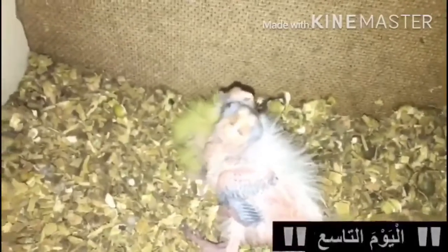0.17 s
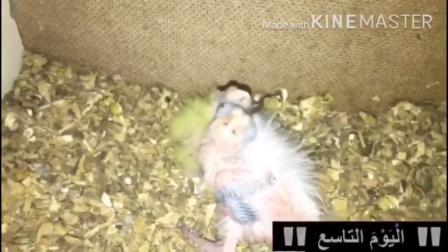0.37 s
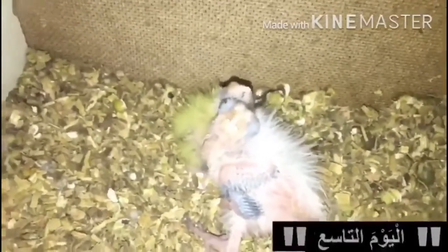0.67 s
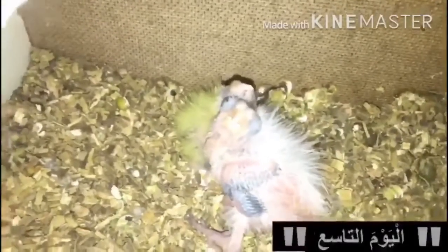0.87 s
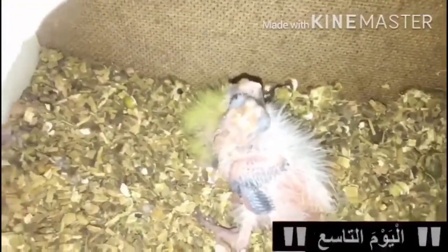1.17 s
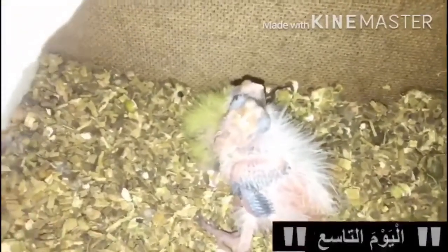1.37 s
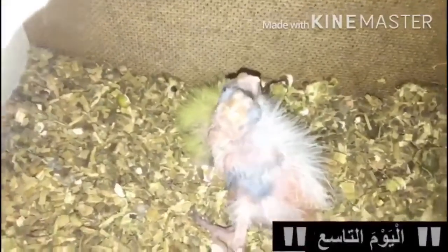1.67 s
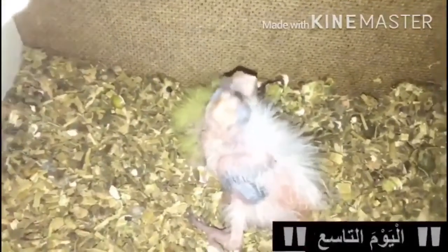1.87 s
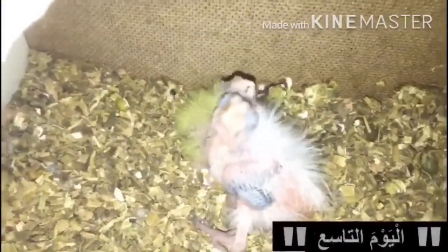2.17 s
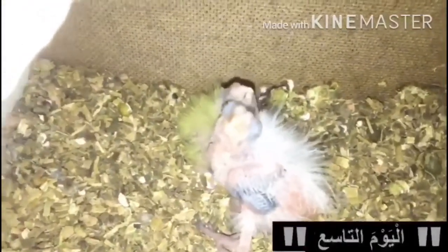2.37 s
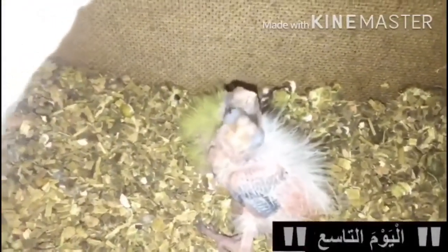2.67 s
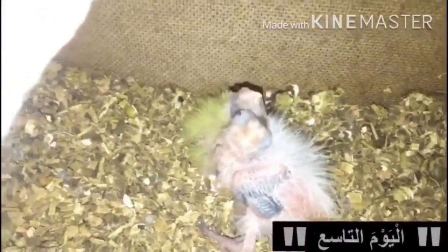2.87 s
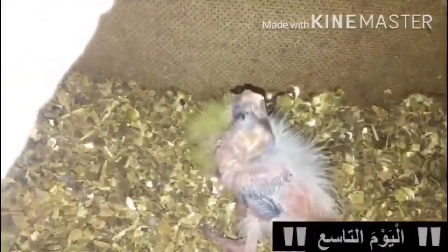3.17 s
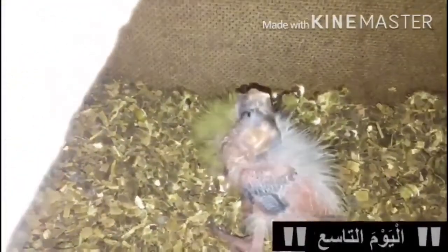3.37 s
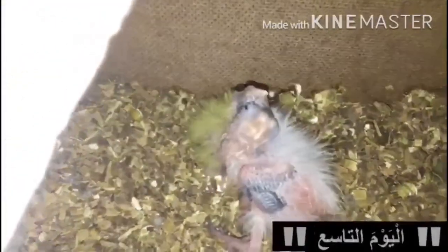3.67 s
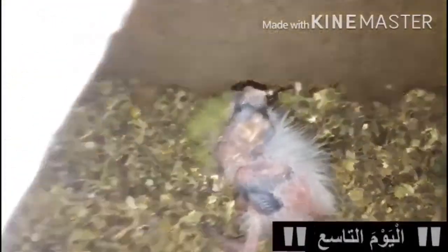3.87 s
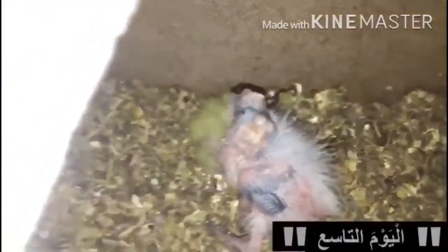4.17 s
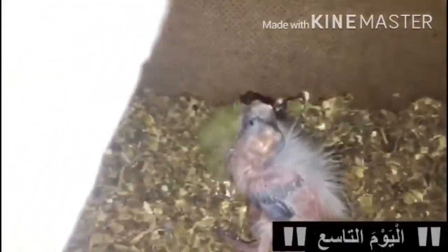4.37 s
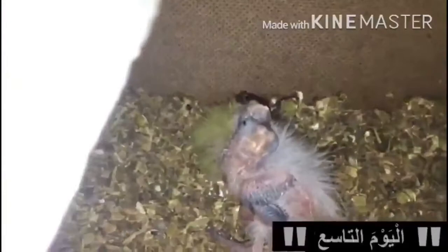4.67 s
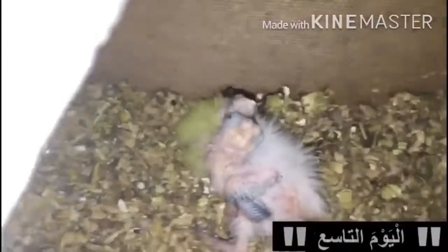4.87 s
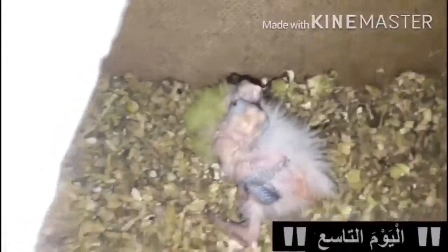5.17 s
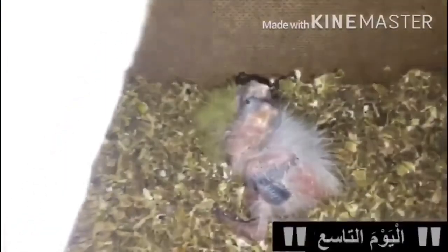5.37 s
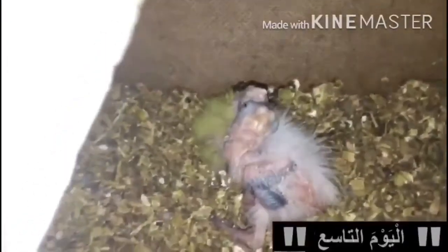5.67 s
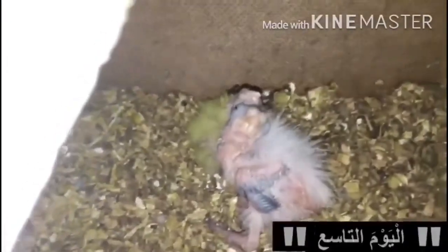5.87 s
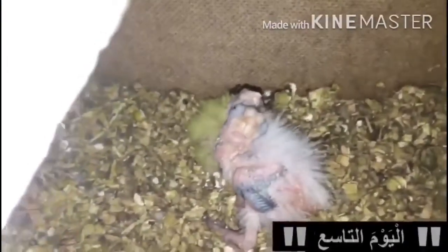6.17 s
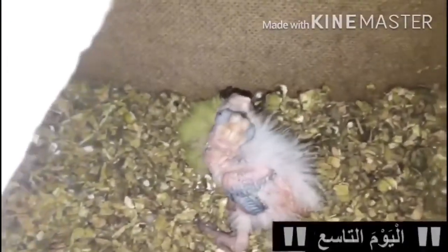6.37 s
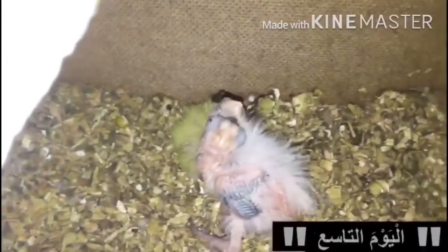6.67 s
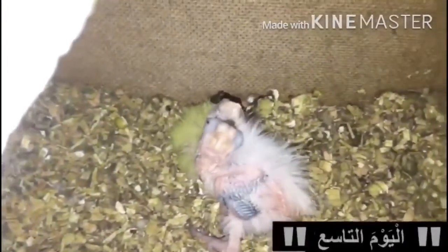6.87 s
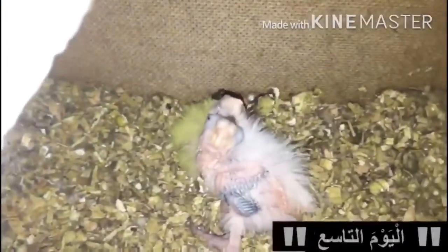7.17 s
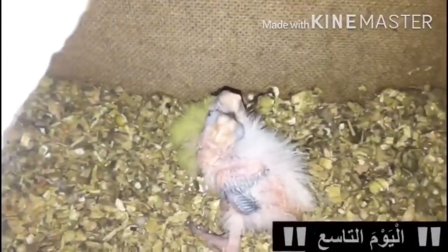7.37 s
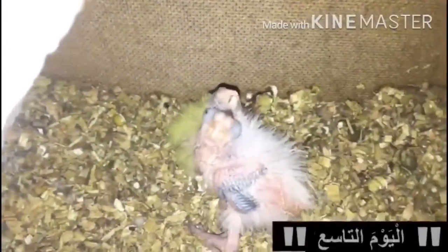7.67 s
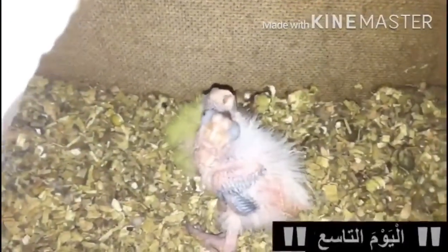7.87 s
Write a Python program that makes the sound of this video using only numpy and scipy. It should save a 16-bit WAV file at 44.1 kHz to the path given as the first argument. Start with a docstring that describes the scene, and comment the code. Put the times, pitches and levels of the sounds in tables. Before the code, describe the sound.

In a small nest box, a parrot chick begs in harsh, unstable screeches around 4 to 6 kHz, edged with hissing air. Rough lower voices near 3 kHz chatter continually with throaty rasping and croaking. From 0 to 3 s the calls come irregularly, several per second, with a small click at 1.6, a rub at 2.4 and a light thud at 2.7. Around 3.5 s a squeak leaps up and drops, beside short whistles. Heavy low thuds cluster from 3.95 to 4.25. The main screech weakens between 4.3 and 5 while chatter and gliding notes continue, then returns sharply near 5.1 and 5.4. Small clicks come around 5.7. Hollow knocks and rubbing hit at 6.7 and 7.0; from 6.9 to 7.9 screeches pulse quickly and evenly, about seven per second. Low rumble persists, its hum stronger after 5.9. Close mono microphone, short boxy echoes.

```python
"""Parrot chick begging in a nest box

A chick screeches harshly: its voice jumps about in pitch, with hissing air on top. Three lower rough
voices chatter over rasping and croaking noise, and gliding tones whistle, all with echoes.
Rubs shake the box as bands of noise, knocks ring it as fading tones, and a low hum and noise rumble.
One microphone feeds both channels.
"""
import sys
import numpy as np
from scipy import signal
from scipy.fft import rfft, irfft, next_fast_len
from scipy.io import wavfile
from scipy.ndimage import uniform_filter1d, map_coordinates

SR = 44100
rng = np.random.default_rng(int(sys.argv[2]) if len(sys.argv) > 2 else 0)


def wrap_up_sound(samples):
    """Save the sound to the file named by the first command line argument, as 16-bit audio."""
    columns = np.atleast_2d(samples).T
    # keep every value between -1 and 1, then stretch to whole-number steps
    tamed = np.clip(columns, -1, 1)
    steps = np.round(tamed * 32767).astype(np.int16)
    wavfile.write(sys.argv[1], SR, steps)


N = 353990  # length of the scene, samples

# In calls and rubs, swell_s is the time taken to rise by SWELL_DB up to the peak.
# Levels are relative ones within the mix; scatter is the size of random pitch jumps, as a share.

# The chick's screeches: [peak_s, swell_s, hold_s, fade_db_per_s, level_db, pitch_hz,
# hiss_db (relative to level_db), scatter_share]
SCREECHES = [ (0.082, 0.22, 0.0053, 90, -16, 4310, -7, 0.23),
             (0.426, 0.034, 0.0055, 62, -38.5, 5350, 4.5, 0.17),
             (0.687, .11, 0.021, 110.5, -27.5, 4540, -2.5, 0.21),
             (0.877, 0.023, 0.058, 109.5, -13.5, 4303, -8.5, 0.22),
             (1.052, 0.18, 0.0094, 100.5, -14.5, 4960, -6, 0.23),
             (1.445, 0.015, .01, 60, -18.5, 4655, -28, 0.049), (1.467, 0.03, .06, 99, -12, 4657, -24, 0.06),
             (1.533, 0.05, 0.043, 130, -16, 5490, -3.5, 0.1407),
             (1.6, 0.065, 0.019, 150, -18, 4470, -18, 0.076),
             (1.79, 0.2, 0.017, 90.5, -18.5, 5270, -6, 0.18),
             (2.02, 0.15, 0.035, 109.5, -21, 4350, -8.5, 0.15),
             (2.171, 0.05, 0.045, 110, -13, 5570, -9, 0.17),
             (2.44, 0.05, 0.043, 80.5, -25, 4540, -7.5, 0.15),
             (2.56, 0.2, 0.046, 120.5, -19.5, 4605, -9, .16),
             (2.864, 0.054, 0.042, 77.5, -22, 4170, -5, 0.18),
             (3.14, 0.37, 0.031, 166, -22.5, 4495, -6.5, 0.21),
             (3.265, 0.06, 0.029, 97.5, -19.5, 4400, -10.5, 0.19),
             (3.552, 0.039, 0.034, 110, -14, 5740, -6, 0.23),
             (3.86, 0.044, 0.054, 101, -21.5, 5300, -7.5, 0.16),
             (4.006, 0.054, 0.0076, 123, -18, 4380, -5.5, 0.16),
             (4.267, 0.056, 0.031, 71, -26, 4405, -5.5, 0.13),
             (4.55, 0.14, 0.051, 45.5, -36.5, 3480, -12, .15), (4.901, .1, 0.13, 97, -36.5, 4304, 0, 0.14),
             (5.086, 0.02, 0.04, 110, -18, 6000, -6, 0.17),
             (5.37, 0.076, 0.032, 109, -11.5, 5120, -7, 0.17),
             (5.771, 0.046, 0.046, 95, -29.5, 4275, -11, 0.0997),
             (5.842, 0.031, 0.039, 110, -23.5, 5410, -3, .08),
             (6.045, 0.036, 0.073, 128.5, -20, 5050, -2, 0.2),
             (6.325, 0.31, 0.0526, 57, -27.5, 4214, -29, 0.15), (6.519, 0.095, .3, 60.5, -42, 4205, 1, .17),
             (6.885, 0.076, 0.033, 157.5, -17.5, 5780, -5.5, 0.15),
             (7.035, 0.067, 0.048, 198, -15.5, 5600, -6.5, 0.17),
             (7.185, 0.067, 0.033, 192, -16, 5200, -2.5, 0.19),
             (7.33, 0.065, 0.025, 206, -16.5, 5256, -2, 0.19),
             (7.465, 0.055, .02, 211, -14.5, 5260, -4, 0.21),
             (7.61, 0.079, 0.04, 171.5, -19, 4297, 0.5, .16),
             (7.76, 0.09, 0.032, 135, -22.5, 5210, 1, 0.17), (7.9, 0.13, 0.022, 164, -22, 5060, -1.5, 0.15)]
# Hissing air: [frequency_hz, level_db_per_hz]
HISS_SPECTRUM = [(3530, -30), (6000, -4), (7200, -9.5), (8510, -10.5), (9320, -14), (11100, -18),
                 (11600, -15), (12100, -87), (15700, -78), (22000, -120)]
# Colour of the open beak: [frequency_hz, gain_db]
BEAK_COLOUR = [(4300, 2.5), (5700, 3), (6300, 0.5), (6900, -6), (8500, -9)]
# Calls of the lower voices: [peak_s, swell_s, hold_s, fade_db_per_s, level_db, pitch_hz, scatter_share]
CHATTERS = [ (0.137, 0.38, 0.012, 90.5, -18.5, 3280, 0.15), (0.276, 0.24, 0.11, 150.5, -22.5, 2764, 0.11),
            (0.636, 0.049, 0.018, 100, -19, 2673, 0.074), (0.7, .08, 0.045, 250.5, -17, 2353, 0.17),
            (0.888, 0.052, 0.024, 69.5, -17.5, 3372, 0.12), (1.047, 0.19, 0.012, 119, -18.5, 3234, 0.09),
            (1.257, 0.76, 0.1, 120, -23, 2818, 0.12), (1.515, 0.091, 0.029, 100, -19.5, 3263, 0.099),
            (1.78, 0.18, 0.14, 156, -24, 2816, .12), (2.031, 0.21, 0.051, 148.5, -21, 2840, 0.1),
            (2.188, 0.094, 0.08, 102, -20.5, 3166, 0.14), (2.45, 0.39, 0.039, 95.5, -24, 2812, .12),
            (2.58, 0.29, 0.041, 110, -22, 2870, 0.14), (2.72, 0.091, 0.037, 149.5, -28, 2309, 0.1),
            (2.835, .05, 0.0601, 109, -25, 3555, .07), (2.879, 0.05, 0.03, 130.5, -21.5, 3274, 0.12),
            (3.051, 0.1, 0.1, 171, -17, 3210, 0.1), (3.3, 0.23, .02, 89, -24, 2870, .12),
            (3.697, 0.35, 0.04076, 103, -24.5, 2750, .1), (3.879, 0.068, 0.04, 146.5, -22.5, 3036, 0.11),
            (3.996, 0.11, 0.059, 130.5, -20, 2837, 0.09), (4.27, 0.11, 0.038, 97.5, -23, 2605, 0.13),
            (4.444, 0.3026, 0.073, 130.5, -18, 2890, 0.09), (4.628, 0.11, 0.051, 150.5, -27.5, 2300, 0.066),
            (4.883, 0.12, 0.05, 139.5, -19.5, 2817, 0.11), (5.023, 0.27, 0.03, 99.5, -24.5, 2307, 0.082),
            (5.118, 0.14, 0.018, 89.5, -20, 2819, 0.16), (5.407, 0.21, 0.074, 90, -14.5, 3080, 0.098),
            (5.6, 0.287, 0.031, 151, -22, 2496, 0.12), (5.82, 0.062, 0.09, 59.5, -19, 2727, 0.11),
            (6.117, 0.29, 0.044, 302, -16.5, 2910, 0.15), (6.255, 0.197, 0.11, 69.5, -21, 3082, 0.11),
            (6.511, 0.076, 0.057, 110.5, -16, 3130, 0.081), (6.689, .2, 0.019, 147.5, -25, 2847, .1),
            (6.787, 0.053, 0.0051, 304, -22, 2692, 0.086), (6.888, 0.054, 0.089, 157, -19.5, 3083, 0.13),
            (7.059, 0.14, 0.035, 98.5, -21.5, 3007, .12), (7.193, 0.22, .01, 130.5, -19.5, 3018, 0.11),
            (7.326, 0.17, 0.021, 133, -20.5, 2796, 0.13), (7.472, 0.076, 0.02, 199, -20, 2952, 0.12),
            (7.62, 0.082, 0.018, 115.5, -17, 3312, 0.12), (7.779, 0.18, 0.086, 98, -21.5, 3003, 0.13)]
# The flock's throats over time: [time_s, rasp_db, croak_db]
THROATS = [(0.0, -33, -40), (0.13, -28, -30.5), (0.65, -32, -39), (0.69, -23, -29), (0.76, -29, -39),
           (0.85, -27, -32), (1.18, -30, -44), (1.97, -33, -36.5), (2.32, -29.5, -45), (2.48, -30.5, -35),
           (2.64, -30.5, -47), (2.68, -27, -30.5), (2.72, -45, -52), (2.83, -36, -48), (2.88, -33, -46.5),
           (3.17, -29.5, -29.5), (3.51, -28.5, -40), (3.58, -31, -47), (3.82, -31, -40.5),
           (4.05, -30.5, -31), (4.09, -33, -44), (4.75, -28, -34), (4.98, -24, -36), (5.19, -32.5, -39),
           (5.56, -24.5, -40), (5.65, -37, -44), (6.59, -33, -44), (6.68, -33, -42), (6.86, -28.5, -42),
           (7.76, -25.5, -38), (8.03, -36, -35)]
# Throaty rasp: [frequency_hz, level_db_per_hz]
RASP_SPECTRUM = [(800, -63), (1100, -10.5), (1300, -4), (1600, -0.5), (2300, -3), (2990, -26), (5060, -120)]
# Throaty croak: [frequency_hz, level_db_per_hz]
CROAK_SPECTRUM = [(440, -104), (720, -17), (950, -1.5), (1150, -4), (1500, -32), (2500, -120)]
# The box's steady boom and rustle over time: [time_s, wall_db, cavity_db, scrape_db]
STEADY_BOX = [(0.0, -31, -28.5, -39.5), (1.59, -34, -30.5, -47.5), (3.89, -42.5, -35.5, -70),
              (4.11, -28.5, -28, -42), (4.45, -39.5, -34, -52.5), (6.2, -36.5, -35, -47),
              (6.84, -39, -32, -47), (7.18, -40.5, -35, -60), (8.03, -39.5, -36.5, -56)]
# Rubs along the box: [peak_s, swell_s, hold_s, wall_db, cavity_db, scrape_db]
RUBS = [(0.18, 0.18, 0.066, -33, -23, -53), (0.83, 0.31, 0.11, -29, -41, -39.5),
        (2.167, 0.23, 0.021, -48, -27, -52), (2.401, 0.089, 0.077, -20.5, -24, -35),
        (2.668, 0.089, 0.017, -40, -44, -41.5), (2.899, 0.31, 0.18, -60, -33.5, -47),
        (3.443, 0.34, 0.046, -44, -40, -45), (3.979, 0.11, 0.09, -30.5, -23.5, -33.5),
        (5.961, 0.22, 0.022, -32.5, -46, -39.5), (6.714, 0.21, 0.018, -30, -18.5, -26),
        (6.878, 0.071, 0.063, -20.5, -17.5, -32)]
# Shaking wall: [frequency_hz, level_db_per_hz]
WALL_SPECTRUM = [(56, -42), (95, -4.5), (167, -3), (220, -1.5), (290, -21), (480, -120)]
# Booming cavity: [frequency_hz, level_db_per_hz]
BOOM_SPECTRUM = [(120, -48), (200, -11), (254, -2), (307, 4.5), (388, -5.5), (500, -21), (650, -67),
                 (1100, -120)]
# Scraping: [frequency_hz, level_db_per_hz]
SCRAPE_SPECTRUM = [(250, -12.5), (420, -3.5), (600, -9.5), (900, -7), (1170, -49), (1980, -120)]
# Level of the low hum over time: [time_s, level_db]
HUM_LEVELS = [(0, -52), (5.7, -53), (5.9, -30.5), (7.1, -30), (7.3, -34.5), (8.03, -29.5)]
# Level of the low noise over time: [time_s, level_db]
RUMBLE_LEVELS = [(0.0, -36), (0.11, -27), (0.36, -45), (0.38, -34), (1.09, -43), (2.35, -38), (2.46, -30),
                 (3.93, -41.5), (4.0, -41), (4.11, -42), (4.85, -38), (5.43, -30.5), (7.29, -36),
                 (8.03, -41)]
# Low noise of the rumble: [frequency_hz, level_db_per_hz]
RUMBLE_SPECTRUM = [(12, -39), (20, -16), (38, -4), (55, -0.5), (75, -10.5), (100, -6), (130, -43),
                   (220, -120)]
# Knocks on the box: [start_s, wall_db, cavity_db, click_db]
KNOCKS = [(1.611, -19.5, -32, -15.5), (2.663, -16, -28, -24), (3.959, -9.5, -22, -20), (3.99, -2, -27, -12),
          (4.053, -1.5, -27, -14), (4.079, -4, -42, -20), (4.233, -4.5, -13.5, -21),
          (5.624, -43, -42, -19.5), (5.694, -43, -19.5, -20), (5.832, -25, -40, -18), (6.722, -23, -7, -9),
          (6.97, -29, -0.5, -10)]
# Tones at which a knocked box rings: [pitch_hz, time_to_fade_60_db_s]
BOX_MODES = [(168, 0.093), (258, 0.24), (410, 0.06), (620, 0.016), (950, 0.0063), (1350, 0.022)]
# Notes of single birds: [start_s, length_s, first_hz, last_hz, level_db, fade_db, scatter_share]
# (a negative fade_db means that the note grows)
WHISTLES = [ (0.458, 0.18, 2188, 2155, -22.5, 14, 0.006), (0.593, 0.042, 1668, 1620, -27.5, 2, 0.013),
            (3.604, 0.087, 2720, 2793, -16.5, 0, 0.025), (3.689, 0.115, 2770, 2804, -29, 10, 0.019),
            (0.613, 0.034, 3010, 2710, -30, 0, .015), (0.627, 0.026, 2300, 2246, -24, -1, .01),
            (0.664, 0.066, 3200, 3252, -24, 2, 0.012), (0.675, 0.041, 2780, 2890, -28, 2, .015),
            (2.848, 0.16, 2736, 2760, -29.5, 6, .015), (3.546, 0.047, 2400, 2386, -15, 9.5, .015),
            (3.572, .04, 5770, 5680, -21, -3, 0.01), (4.734, 0.093, 1423, 1350, -31.5, 4, 0.027),
            (4.86, 0.11, 2605, 2670, -21, 8, .025), (4.959, 0.12, 4210, 4270, -32, 4, 0.046),
            (3.965, 0.14, 2733, 2778, -22.5, 6.5, 0.02), (4.227, 0.079, 2374, 2455, -17, 28, 0.0088),
            (4.369, 0.19, 2738, 2740, -23, -1, 0.018), (4.567, 0.096, 6890, 6260, -51, -6, .025),
            (4.6, 0.12, 2212, 2134, -21.5, 6, 0.023), (4.725, 0.11, 2700, 2588, -26, -5, 0.027),
            (4.76, 0.094, 4690, 4960, -40.5, -5, 0.028), (4.835, 0.13, 2950, 3024, -23, -1, 0.034),
            (4.968, 0.14, 2064, 2142, -25, 5, 0.027), (5.254, 0.092, 2770, 2725, -16.5, 16, 0.022),
            (5.419, 0.14, 3240, 3212, -19, 7, 0.039), (5.857, .14, 1527, 1453, -35.5, 2, 0.027),
            (6.12, 0.091, 2737, 2795, -17, 10, 0.016), (6.26, 0.1, 3370, 3380, -25, 8, 0.019),
            (6.491, 0.086, 3097, 3226, -19.5, 1.5, 0.025), (7.451, .07, 2680, 2653, -20, 4, 0.019)]
# One squeak that climbs, drops to a second step and falls away:
# [time_s, pitch_hz, level_db, scatter_share]
SQUEAK = [(3.448, 1567, -36, 0.011), (3.464, 1828, -22, 0.016), (3.478, 2150, -25, 0.016),
          (3.496, 2404, -21, 0.011), (3.548, 2437, -14.5, 0.012), (3.552, 2130, -14, 0.023),
          (3.59, 2010, -25, 0.023), (3.66, 2153, -20, 0.038), (3.672, 1605, -19, 0.011),
          (3.697, 1490, -29, 0.018)]
# How long the echoes last: [frequency_hz, time_to_fade_60_db_s]
ECHO_TIMES = [(1000, 0.16), (3000, 0.26), (6000, 0.12), (11000, 0.067)]
# Tones the box's air favours: [centre_hz, width_hz, level_db (relative to direct sound)]
AIR_MODES = [(2727, 46, -7), (3480, 200, -9), (2152, 260, -11)]
# Treble fall of the whole sound: [frequency_hz, gain_db]
TREBLE_FALL = [(9500, -2), (11000, -6.5), (12200, -21.5)]

CLOCK = np.arange(0, N / SR + .01, 1 / 500)  # times at which loudness shapes are worked out, s
SWELL_DB = 20
SCREECH_REST_HZ, SCREECH_DRIFT_S = 4030, .38  # after its peak each call's pitch drifts towards rest
BETWEEN_DB, BETWEEN_HISS_DB = -51.5, -47.5  # faint wheeze and hiss between screeches
OCTAVE_DB, OCTAVE_LOSS_DB = 0, 89  # the screech's octave when clean, and its loss per unit of scatter
CHATTER_REST_HZ, CHATTER_DRIFT_S, MURMUR_DB = 2527, .5, -34  # resting pitch, drift time, quiet floor
CHOIR_SPREAD = 0.99  # distance of the outer voices from the middle one, in units of the scatter
RUB_FALL_DB_S = 115  # how fast a rub fades, dB per s
FADE_S = 0.0066  # a note's fade in and out
REDRAW_S = .12  # echo tails are redrawn this often, so no fixed stripes ring
TOP_HZ = 12260  # nothing is kept from here up


def amp(db):
    """Turn decibels into gain."""
    return 10 ** (np.asarray(db) / 20)


def unit(x):
    """Scale x to an average (rms) strength of 1."""
    return x / np.sqrt(np.mean(x ** 2) + 1e-20)


def along(points, hz):
    """Read a (frequency, value) curve on a log frequency axis."""
    f, v = np.transpose(points)
    return np.interp(np.log(hz + 1), np.log(f + 1), v)


def curves(rows):
    """Give one value per sample for each column after the time."""
    s, *columns = np.transpose(rows)
    return [np.interp(np.arange(N) / SR, s, column) for column in columns]


def wobble(rate):
    """Draw a smooth random curve with this many knots a second."""
    knots = rng.standard_normal(int(N * rate / SR) + 4)
    return map_coordinates(knots, [np.arange(N) * rate / SR])


def filtered(x, response):
    """Change the strength of each frequency in x by a response curve."""
    size = next_fast_len(N + SR // 2)
    hz = np.fft.rfftfreq(size, 1 / SR)
    return irfft(rfft(x, size) * response(hz), size)[..., :N]


def noise(spectrum):
    """Make coloured noise of rms 1."""
    white = rng.standard_normal(N)
    return unit(filtered(white, lambda hz: amp(along(spectrum, hz))))


def shapes(rows, fall_db_s):
    """Shape each event in dB (swell, hold, steady fade) and give the time since its peak."""
    peak, swell, hold = np.transpose(rows)[:3, :, None]
    age = CLOCK - peak
    rise = SWELL_DB * np.minimum(age, 0) / np.abs(swell)
    fall = fall_db_s * np.maximum(age - np.abs(hold), 0)
    return rise - fall, np.maximum(age, 0)


def summed(dbs, floor_db):
    """Add the powers of all events and a floor, as gain per sample."""
    power = np.sum(amp(dbs) ** 2, axis=0) + amp(floor_db) ** 2
    return np.interp(np.arange(N) / SR, CLOCK, np.sqrt(power))


def loudest(dbs, values):
    """Average the calls' values, strongly favouring the loudest call, per sample."""
    weight = amp(dbs) ** 4 + 1e-30
    average = np.sum(weight * values, axis=0) / weight.sum(axis=0)
    return np.interp(np.arange(N) / SR, CLOCK, average)


def syrinx(hz, scatter, rate, flutter_db, octave_db):
    """A membrane in chaos: its pitch jumps about its centre and its strength flutters."""
    jumping_hz = hz * np.exp(scatter * wobble(rate))
    phase = 2 * np.pi * np.cumsum(jumping_hz) / SR
    flutter = amp(flutter_db * wobble(rate / 3))
    return unit(flutter * (np.sin(phase) + amp(octave_db) * np.sin(2 * phase)))


def patchy(x, depth_db):
    """Uneven colour: narrow bands of the rough voices swell and fade at random."""
    z = signal.stft(x, nperseg=512)[2]
    field = uniform_filter1d(rng.standard_normal(z.shape), size=3, axis=0)  # across frequency
    field = uniform_filter1d(field, size=18, axis=1)  # across time
    gain = amp(depth_db * unit(field))
    return signal.istft(z * unit(gain), nperseg=512)[1][:N]


def room(x, wet_db):
    """Add echoes in which each frequency dies at its own speed, drawn anew for each stretch."""
    hop = round(REDRAW_S * SR)
    count = N // hop + 2
    hz, t, z = signal.stft(rng.standard_normal((count, SR // 4)), SR, nperseg=256)
    decay = amp(-60 * t / along(ECHO_TIMES, hz)[:, None])
    tails = signal.istft(z * decay, SR, nperseg=256)[1]
    tails = tails / np.linalg.norm(tails, axis=1, keepdims=True)
    # overlapping stretches of sound fade into each other, each with its own tail
    padded = np.pad(x, (hop, 2 * hop))
    fade = np.sin(np.pi * np.arange(2 * hop) / (2 * hop))
    wet = np.zeros(len(padded) + SR)
    for k, tail in enumerate(tails):
        stretch = padded[k * hop:][:2 * hop] * fade[:len(padded) - k * hop]
        echo = signal.fftconvolve(stretch, tail)
        wet[k * hop:][:len(echo)] += echo
    return (x + amp(wet_db) * wet[hop:][:N]) / np.hypot(1, amp(wet_db))


def chick():
    """The screech is a chaotic voice, with air hissing through the open beak."""
    fall_db_s, db, hz, hiss_db, scatter = np.transpose(SCREECHES)[3:, :, None]
    shape, age = shapes(SCREECHES, fall_db_s)
    level = db + shape
    pitch = SCREECH_REST_HZ + (hz - SCREECH_REST_HZ) * np.exp(-age / SCREECH_DRIFT_S)
    scatter = loudest(level, scatter)
    voice = syrinx(loudest(level, pitch), scatter, rate=1200, flutter_db=1.5,
                   octave_db=OCTAVE_DB - OCTAVE_LOSS_DB * scatter)
    voice = unit(filtered(voice, lambda f: amp(along(BEAK_COLOUR, f))))
    hiss_gain = summed(level + hiss_db, BETWEEN_HISS_DB) * amp(0.37 * wobble(150))
    hiss = hiss_gain * noise(HISS_SPECTRUM)
    return patchy(summed(level, BETWEEN_DB) * voice + hiss, depth_db=0.87)


def chatter():
    """Three lower chaotic voices sound at once over a throaty rasp and croak of noise."""
    fall_db_s, db, hz, scatter = np.transpose(CHATTERS)[3:, :, None]
    shape, age = shapes(CHATTERS, fall_db_s)
    level = db + shape
    pitch = CHATTER_REST_HZ + (hz - CHATTER_REST_HZ) * np.exp(-age / CHATTER_DRIFT_S)
    pitch = loudest(level, pitch)
    scatter = loudest(level, scatter)
    voices = sum(syrinx(pitch * np.exp(k * CHOIR_SPREAD * scatter), scatter,
                        rate=600, flutter_db=1.5, octave_db=-37)
                 for k in (-1, 0, 1))
    rasp_db, croak_db = curves(THROATS)
    rasp = amp(rasp_db + 2.0 * wobble(60)) * noise(RASP_SPECTRUM)
    croak = amp(croak_db + 2.3 * wobble(40)) * noise(CROAK_SPECTRUM)
    return patchy(summed(level, MURMUR_DB) * unit(voices) + rasp + croak, depth_db=2.0)


def rumble():
    """The rumble is a wavering low hum in low noise."""
    hum_hz = 33 * np.exp(0.0525 * wobble(2.4))
    hum = unit(np.sin(2 * np.pi * np.cumsum(hum_hz) / SR))
    hum_gain = amp(curves(HUM_LEVELS)[0])
    return hum_gain * hum + amp(curves(RUMBLE_LEVELS)[0]) * noise(RUMBLE_SPECTRUM)


def rubbed_box():
    """Rubbing shakes wall and cavity in lumps and scrapes, over a steady boom and rustle."""
    shape = shapes(RUBS, RUB_FALL_DB_S)[0]
    rubs = [summed(db + shape, -120) for db in np.transpose(RUBS)[3:, :, None]]
    wall_gain, boom_gain, scrape_gain = np.hypot(rubs, amp(curves(STEADY_BOX)))
    wall = wall_gain * amp(1.5 * wobble(25)) * noise(WALL_SPECTRUM)
    boom = boom_gain * amp(0.97 * wobble(25)) * noise(BOOM_SPECTRUM)
    scrape = scrape_gain * amp(2.9 * wobble(30)) * noise(SCRAPE_SPECTRUM)
    return wall + boom + scrape


def whistles():
    """Trembling tones glide in pitch while fading, holding or growing, with a flutter in strength."""
    out, tremble = np.zeros(N), wobble(300)
    notes = [[(s, first, db, scatter), (s + length, last, db - fade_db, scatter)]
             for s, length, first, last, db, fade_db, scatter in WHISTLES]
    for note in notes + [SQUEAK]:
        s, hz, db, scatter = np.transpose(note)
        start = round(s[0] * SR)
        t = np.arange(s[0], s[-1], 1 / SR)
        trembling = np.exp(np.interp(t, s, scatter) * tremble[start:][:len(t)])
        pitch = np.interp(t, s, hz) * trembling
        phase = 2 * np.pi * np.cumsum(pitch) / SR
        fade = signal.windows.tukey(len(t), min(2 * FADE_S * SR / len(t), 1))
        gain = amp(np.interp(t, s, db) + 5.5)  # all notes are raised by 5.5 dB
        out[start:][:len(t)] += gain * np.sin(phase) * fade
    return out * amp(2.2 * wobble(90))


def knocks():
    """Each knock rings the box's modes, tones that die away at their own speeds."""
    out = np.zeros(N)
    t = np.arange(SR // 4) / SR
    rings = np.array([-amp(-60 * t / t60) * np.sin(2 * np.pi * hz * t) for hz, t60 in BOX_MODES])
    rings[:3] *= 1 - np.exp(-t / 0.0024)  # the low modes start softly, the click at once
    for s, wall, cavity, click in KNOCKS:
        gains = amp([wall, cavity, wall - 4, click - 1.5, click - 4, click - 8])  # one per mode
        out[round(s * SR):][:len(t)] += gains @ rings
    return out


def box_air(f):
    """The box's air resonates: it adds a peak at each favoured tone to the direct sound."""
    peaks = sum(amp(db) * 1j * f * width / (centre ** 2 - f * f + 1j * f * width)
                for centre, width, db in AIR_MODES)
    return 1 + peaks


def scene():
    """All sources reach one microphone; rough voices pass through the box's air."""
    rough = room(chick(), wet_db=-0.5) + room(chatter(), wet_db=-5.5)
    box = rumble() + rubbed_box() + knocks()
    far = room(whistles(), wet_db=-5)
    return np.tile(filtered(rough, box_air) + far + box, (2, 1))


def record(dry):
    """Clip softly just under full scale, soften the treble, then cut everything above the band."""
    soft = dry / (1 + np.abs(dry / .9) ** 5) ** (1 / 5)
    return filtered(soft, lambda hz: amp(along(TREBLE_FALL, hz)) * (hz < TOP_HZ))


dry = scene()
out = record(dry)
wrap_up_sound(out)
```